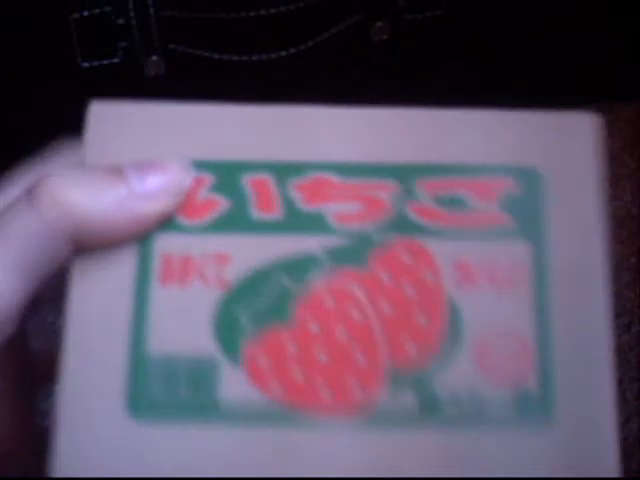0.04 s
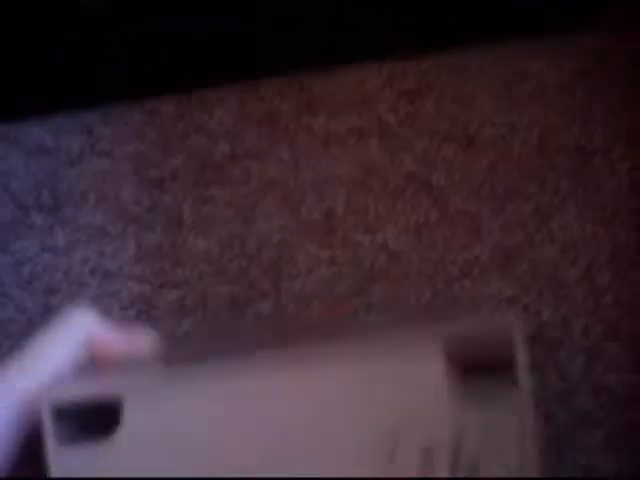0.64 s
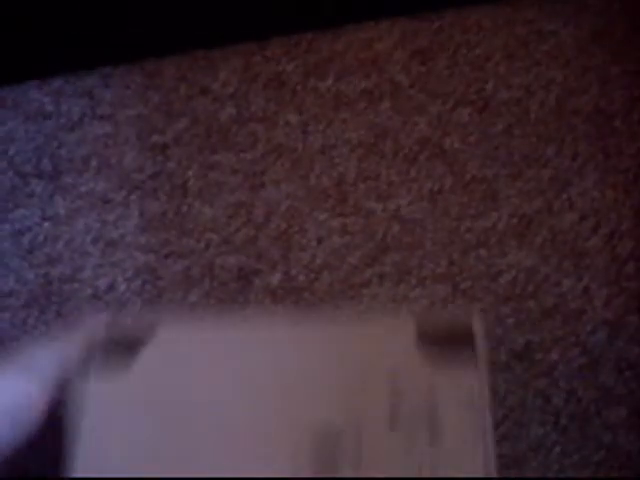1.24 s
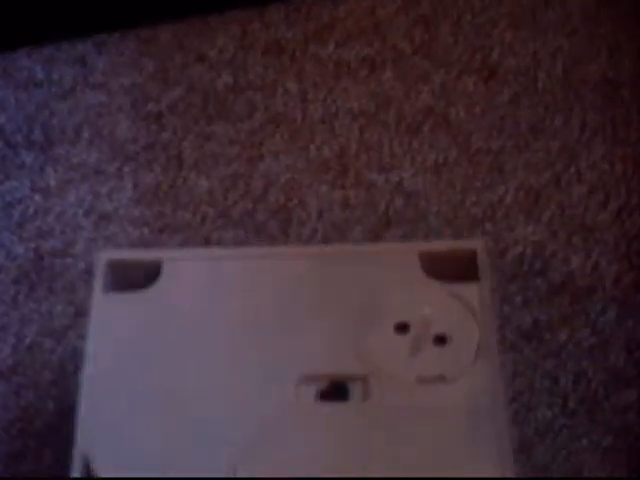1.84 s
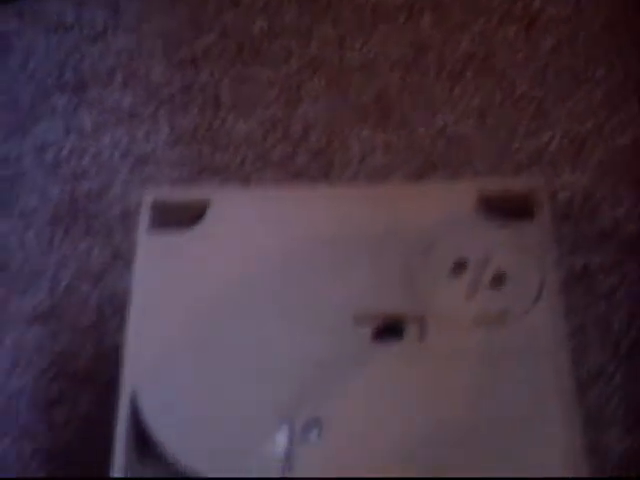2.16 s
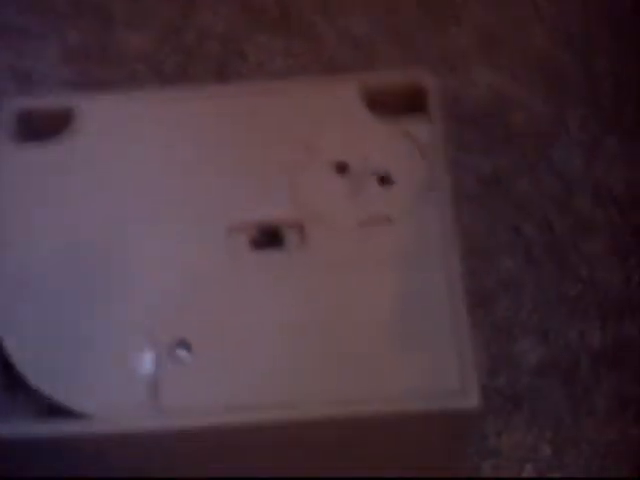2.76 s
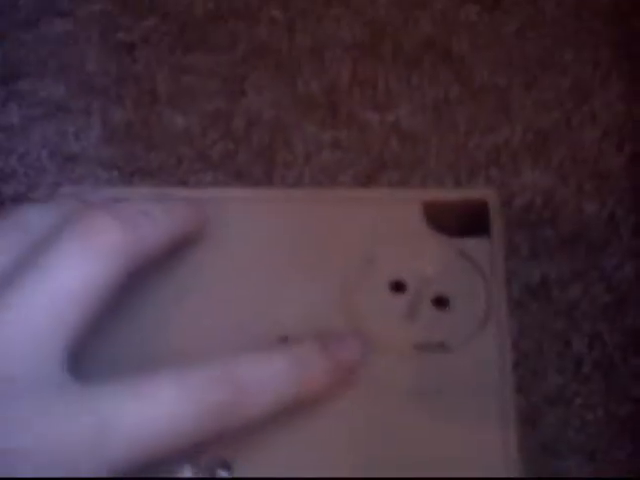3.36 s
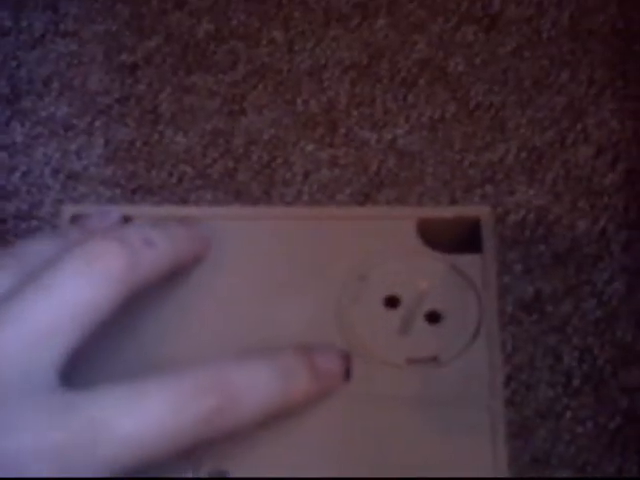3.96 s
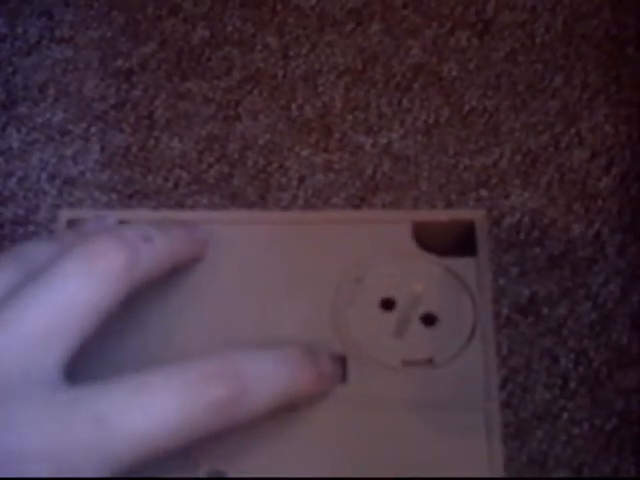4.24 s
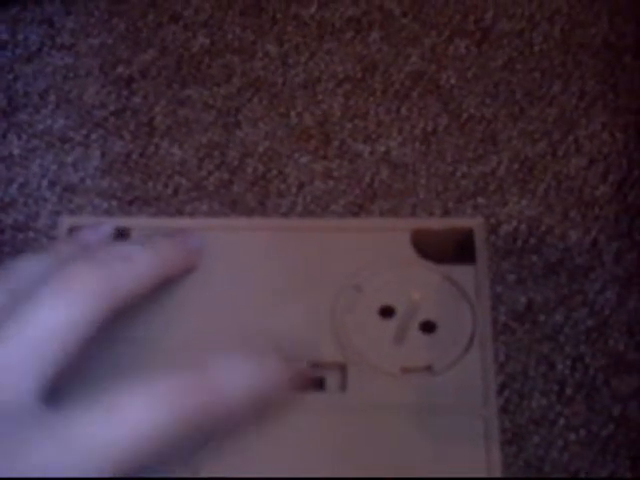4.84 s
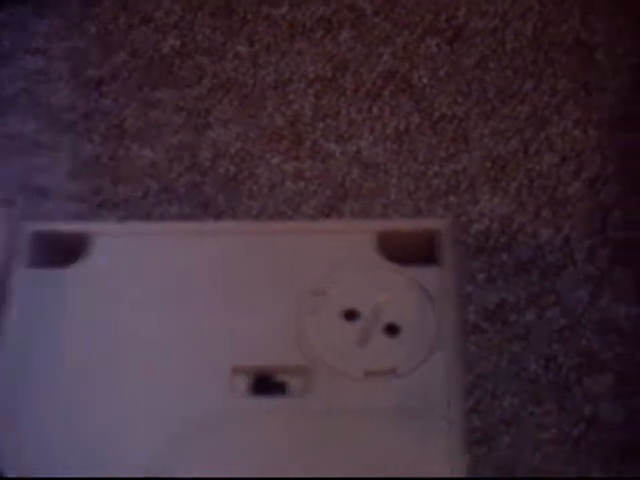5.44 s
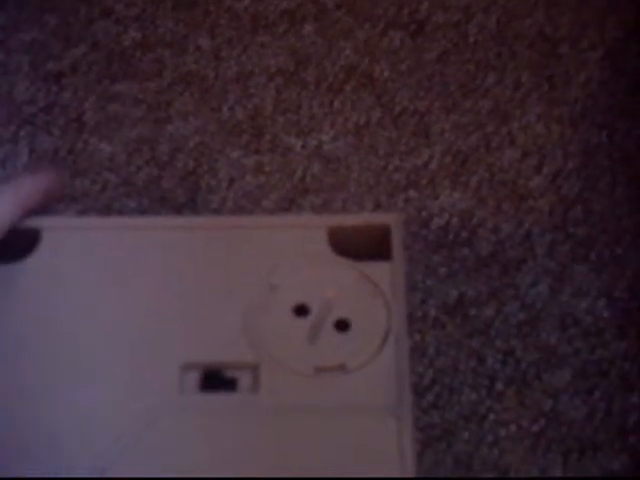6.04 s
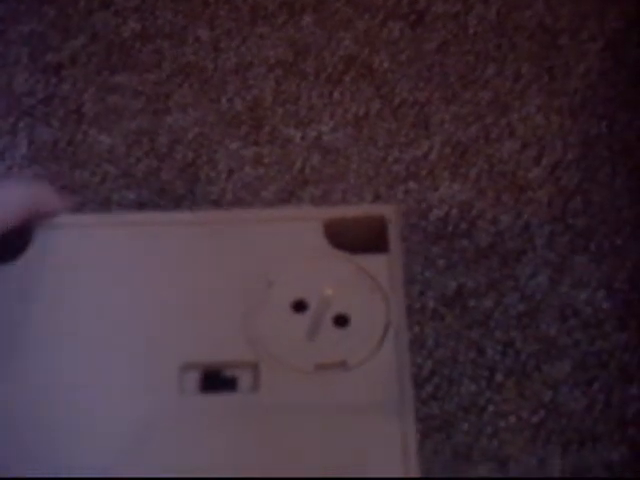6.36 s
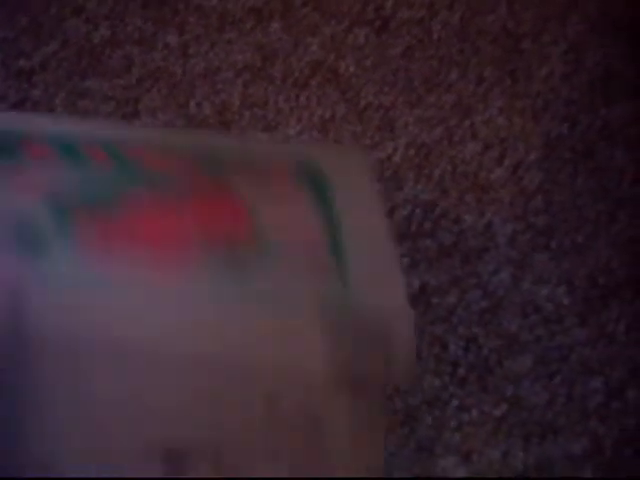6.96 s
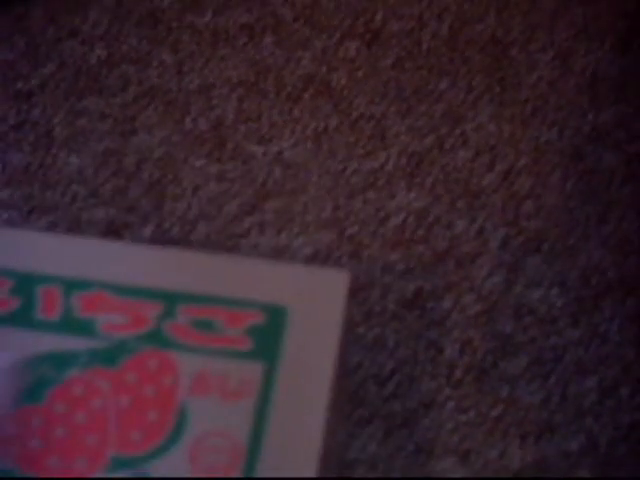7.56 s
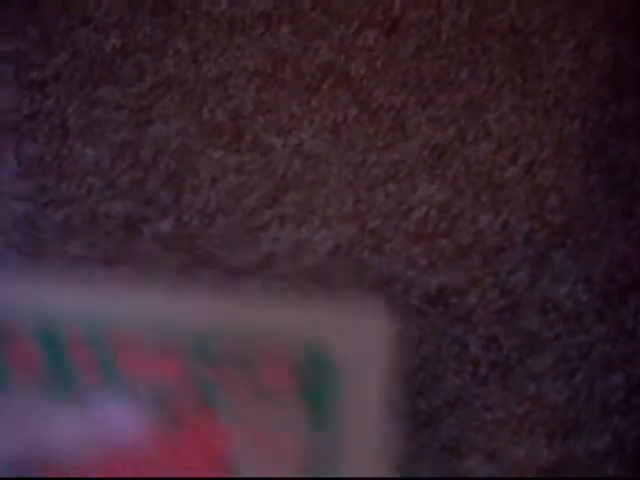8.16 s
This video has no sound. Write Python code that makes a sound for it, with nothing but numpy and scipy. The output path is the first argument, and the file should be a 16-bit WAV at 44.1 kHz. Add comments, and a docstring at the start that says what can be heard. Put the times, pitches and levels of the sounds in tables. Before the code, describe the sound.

A hollow plastic box is turned over on carpet, clattering down twice, with light taps and clicks between, over faint hiss.

```python
"""A hollow plastic toy box is turned over on a carpet, its switch is slid, and it is turned back.
Fingers press, rub and tap it, and each touch makes the shell ring. Twice it tips over, thumps the
floor and bounces while its loose parts rattle. In between, its seam snaps and the switch clicks.
The small room adds a short echo. A little camera hisses and ticks throughout, and it holds
each of its coarse samples, which adds a gritty treble."""
import sys
import numpy as np
from scipy import signal
from scipy.fft import rfft, irfft, next_fast_len
from scipy.io import wavfile
from scipy.ndimage import map_coordinates

SR = 44100
rng = np.random.default_rng(int(sys.argv[2]) if len(sys.argv) > 2 else 0)


def wav_out(sig):
    """Save sig, one row per channel (or a flat mono array), as 16-bit PCM at SR to the path in sys.argv[1]."""
    wavfile.write(sys.argv[1], SR, np.round(np.clip(np.atleast_2d(sig).T, -1, 1) * 32767).astype(np.int16))


N = 361619
CAMERA_SAMPLE_HZ = 8000


def amp(db):
    """Turn decibels into a number to multiply by."""
    return 10 ** (np.asarray(db) / 20)


def unit(x):
    """Scale a sound so its average strength (rms) is 1."""
    return x / np.sqrt(np.mean(x ** 2) + 1e-20)


def along(points, hz):
    """Read between (frequency, value) points, giving each octave about equal room."""
    point_hz, values = np.transpose(points)
    return np.interp(np.log(hz + 1), np.log(point_hz + 1), values)


def fade(t, t60):
    """Die away by 60 dB in t60 seconds, the fade time."""
    return np.exp(-np.log(1000) * t / np.maximum(t60, 1e-4))


def filtered(x, response):
    """Turn each frequency up or down by response(hz)."""
    size = next_fast_len(len(x) + SR // 4)
    return irfft(rfft(x, size) * response(np.fft.rfftfreq(size, 1 / SR)), size)[:len(x)]


def band(x, hz, kind, order=2):
    """Keep one range of frequencies."""
    return signal.sosfilt(signal.butter(order, hz, kind, fs=SR, output="sos"), x)


def resonance(x, hz, width_hz):
    """Keep a narrow band that rings around one pitch."""
    return signal.lfilter(*signal.iirpeak(hz, hz / width_hz, fs=SR), x)


def add(track, s, x):
    """Mix x into the track, starting at s seconds."""
    part = track[max(round(s * SR), 0):][:len(x)]
    part += x[:len(part)]


# The tone of the hiss, from low to high: f/Hz, relative level/dB
HISS_TONE = [(59, -18), (100, 1), (269, -6), (316, -3), (372, -5), (444, -5.5), (1180, -9.5), (3400, -7),
             (4000, -9)]


def hiss(level_db=-59.5, flutter_db=1):
    """The camera's amplifier makes a soft noise whose level wavers a little."""
    def tone(hz):
        return amp(along(HISS_TONE, hz)) * (hz > 20) * (hz < CAMERA_SAMPLE_HZ / 2)
    noise = unit(filtered(rng.standard_normal(N), tone))
    flutter = map_coordinates(rng.standard_normal(N // 100), [np.arange(N) * 90 / SR])  # 90 a second
    return noise * amp(level_db + flutter_db * flutter)


def frame_buzz(frame_hz=14.222, on_s=.0331, off_s=.0651, sag_s=.008):
    """In every frame the camera's power sags softly, then its sensor ticks on and off."""
    ticks, sags = np.zeros((2, N))
    t = np.arange(SR // 20) / SR
    spike = np.exp(-t / .00016)
    for s in np.arange(0, N / SR, 1 / frame_hz):
        on_db, off_db, sag_db = rng.normal([-47, -41.5, -48], 1.5)
        add(ticks, s + on_s, amp(on_db) * spike)
        add(ticks, s + off_s, -amp(off_db) * spike)
        add(sags, s + on_s - sag_s, -amp(sag_db) * (t < sag_s))
    # a capacitor blocks the slowest part of the sag; cutting the highs keeps it soft
    return ticks + filtered(sags, lambda hz: hz ** 2 / (hz ** 2 + 34 ** 2) / (1 + (hz / 130) ** 4))


# The tones the hollow shell rings with: f/Hz, level/dB, fade time/s
SHELL_TONES = [(367.7, -12, 0.056), (409, -9.5, 0.0408), (526, -12.5, 0.031), (707.4, -9.5, 0.071),
               (851, -7, 0.044), (964, -8.5, 0.015), (1118, -1.5, 0.023), (1266, -6.5, 0.023),
               (1465, -11.5, 0.032), (1787, -16.5, 0.019), (1796, -12.5, 0.029), (2036, -0.5, 0.016),
               (2970, -15, 0.037), (3158, -9, 0.014), (3490, -14.5, 0.016)]


def shell_ring(ring_scale=1, spread_db=3.0):
    """Each spot rings the shell with its own mix of tones. A grip (ring_scale below 1) shortens them."""
    t = np.arange(SR // 6) / SR
    hz, db, t60 = np.transpose(SHELL_TONES)[:, :, None]
    strength, detune = rng.standard_normal((2, len(SHELL_TONES), 1))
    shifted_hz = hz * (1 + .007 * detune)  # each blow also shifts the pitches a little at random
    tones = amp(db + spread_db * strength) * fade(t, ring_scale * t60) * np.sin(2 * np.pi * shifted_hz * t)
    crack = amp(6) * fade(t, 0.018) * rng.standard_normal(len(t))
    return tones.sum(0) + crack


def thud_knock_clack(x):
    """Split a sound into the hollow's low thud, the panels' knock and the edges' high clack."""
    return [band(x, hz, "bandpass", order=3) for hz in ([245, 550], [660, 1450], [1650, 3900])]


def chatter(x, chatter_s, rebound=0.69, count=3):
    """Loose parts rebound at uneven gaps, spreading a blow out in time but keeping its tone."""
    size = 2 * len(x)
    gaps_s = chatter_s * rng.uniform(.1, .55, (count, 1))
    delays = np.exp(-2j * np.pi * gaps_s * np.fft.rfftfreq(size, 1 / SR))
    rebounds = np.prod((delays + rebound) / (1 + rebound * delays), axis=0)
    return irfft(rfft(x, size) * rebounds)[:len(x)]


def strike(db, thud_db, clack_db, knock_hz, clack_hz, chatter_s, ring_scale=1, spot_db=6,
           knock_width_hz=190, clack_width_hz=190, thud_t60=.2):
    """One blow on the box. The knock peaks at db; thud_db and clack_db are counted from there."""
    ring = shell_ring(ring_scale)
    t = np.arange(len(ring)) / SR
    thud = thud_knock_clack(ring)[0] * fade(t, thud_t60)
    _, knock, clack = thud_knock_clack(chatter(ring, chatter_s))
    # a light touch rings mostly the touched spot; a hard one rings the whole shell and snaps its rim
    spot_gain = amp(spot_db - 0.17 * (db + 29))
    rim_snap = amp(-6 + 0.047 * (db + 40)) * resonance(clack, hz=2980, width_hz=500)
    knock = knock + spot_gain * resonance(knock, knock_hz, knock_width_hz)
    clack = clack + spot_gain * resonance(clack, clack_hz, clack_width_hz) + rim_snap
    thud, knock, clack = (x / np.abs(x).max() for x in (thud, knock, clack))
    # every blow also pushes the whole box against the soft floor
    push = amp(-24) * np.sin(2 * np.pi * 135 * t) * fade(t, 0.026)
    return amp(db) * (push + amp(thud_db) * thud + knock + amp(clack_db) * clack)


# Finger pads press on the shell: t/s, knock level/dB, thud above knock/dB
FINGER_PRESSES = [(0.228, -52.5, 1.5), (0.423, -56, 6.5), (6.635, -49, 1), (6.812, -46, 2.5),
                  (7.665, -46.5, -0.5)]


def presses():
    """Soft finger pads give a blurred knock with a longer thud."""
    track = np.zeros(N)
    for s, db, thud_db in FINGER_PRESSES:
        add(track, s, strike(db, thud_db, clack_db=-5, knock_hz=756, clack_hz=2030,
                             chatter_s=0.0062, thud_t60=.3))
    return track


# The shell rubs on fingers or carpet: start/s, end/s, level/dB, scratch above mid tones/dB
RUBS = [(0.491, 0.726, -72.5, 5.5), (0.976, 1.174, -57, -5), (1.523, 1.6, -47, -8), (1.58, 1.75, -60, -7.5),
        (3.148, 3.29, -63, -5), (4.059, 4.4, -73.5, -10.5), (6.455, 6.838, -61.5, -3),
        (6.781, 7.248, -61, -0.5), (7.269, 7.36, -50.5, 5), (7.429, 7.499, -49.5, -14),
        (7.502, 7.727, -65, 2.5)]


def rubbing(slips_per_s=2500):
    """Rubbing is a fast run of tiny slips, heard both directly and through the shell."""
    track = np.zeros(N)
    t = np.arange(SR) / SR  # time since the rub began
    for start, end, db, scratch_db in RUBS:
        slips = rng.standard_normal(SR) * (rng.random(SR) < slips_per_s / SR)
        through_shell = unit(signal.fftconvolve(slips, shell_ring())[:SR])
        direct = amp(-3) * unit(band(slips, 4300, "lowpass"))
        low, mid, scratch = map(unit, thud_knock_clack(through_shell + direct))
        progress = np.clip(t / (end - start), 0, 1)
        speed = np.sqrt(np.abs(np.sin(np.pi * progress)))  # speeds up, then slows to a stop
        add(track, start, amp(db) * speed * (amp(-6) * low + mid + amp(scratch_db) * scratch))
    return track


def tap(db, clack_db, knock_hz):
    """The thud grows more slowly than the knock, so soft taps sound hollow and hard ones click."""
    thud_db = -6.5 - 0.59 * (db + 40)
    return strike(db, thud_db, clack_db, knock_hz, clack_hz=2030, chatter_s=0.0018, ring_scale=.8)


# Fingers tap the shell: t/s, knock level/dB, clack above knock/dB, knock f/Hz
FINGER_TAPS = [(0.653, -56.5, 13, 877), (0.678, -46, 0.5, 830), (0.702, -58, 14, 1100),
               (0.783, -50, 2, 1060), (0.975, -32.5, -3, 930), (0.990, -41.5, 0.5, 880),
               (1.077, -38.5, -4, 1000), (1.638, -43.5, -12, 1050), (2.233, -48.5, 7, 1080),
               (2.542, -40, -19, 1050), (2.601, -41, -19, 1100), (3.158, -47, 3, 864),
               (4.052, -36, -11.5, 1130), (4.902, -44.5, -5, 1200), (5.510, -36.5, -16, 1110),
               (5.531, -39.5, -4, 743), (5.546, -39, 0, 710), (6.483, -40, -15, 970),
               (6.496, -36.5, -6.5, 1050), (6.544, -36, -12.5, 1290), (6.571, -40, -1, 670),
               (6.689, -34.5, 4, 820), (7.114, -30, -8, 920), (7.252, -41, -2, 1130),
               (7.291, -39.5, 8.5, 1350)]


def taps():
    """Fingertips and nails hit the panels, each spot with its own pitch."""
    track = np.zeros(N)
    for s, db, clack_db, knock_hz in FINGER_TAPS:
        add(track, s, tap(db, clack_db, knock_hz))
    return track


def floor_thump(t60=0.095):
    """The floor under the carpet answers a blow with a short, deep noise."""
    t = np.arange(SR // 4) / SR
    return unit(band(rng.standard_normal(len(t)), [50, 120], "bandpass")) * fade(t, t60)


def fall_hit(db, thud_db, clack_db, knock_hz=843, **spot):
    """One clattering blow on the shell as the box falls."""
    return strike(db, thud_db, clack_db, knock_hz, clack_hz=2070, chatter_s=.0026, ring_scale=.84, **spot)


# The tipping box lands: t/s, knock level/dB, thud above knock/dB, clack above knock/dB, knock f/Hz
EDGE_LANDINGS = [(1.439, -5, -15, -6, 1080), (1.452, -20.5, -10.5, -8, 850), (1.476, -16.5, -11, -0.5, 790),
                 (1.505, -12, -9, -8, 1030), (7.340, -16, -8, -3, 800), (7.38, -20, -13, -0.5, 970),
                 (7.391, -7.5, -9, -4.5, 896)]


def landings(corner_gap_s=.0052):
    """An edge thumps the floor and lands on two corners, the softer one first."""
    track = np.zeros(N)
    for s, db, thud_db, clack_db, knock_hz in EDGE_LANDINGS:
        add(track, s, amp(db - 25) * floor_thump())
        for lag_s, corner_db in (0, -5), (corner_gap_s, 0):
            add(track, s + lag_s, fall_hit(db + corner_db, thud_db, clack_db, knock_hz,
                                           spot_db=5, knock_width_hz=220, clack_width_hz=470))
    return track


def rattle(parts=2):
    """Each landing throws the loose parts up, and they drop back at random moments."""
    track = np.zeros(N)
    for s, db, *_ in EDGE_LANDINGS:
        for flight_s in rng.uniform(.009, .025, parts):
            add(track, s + flight_s, fall_hit(db - 17.5, thud_db=-13.5, clack_db=-1))
    return track


# The box rocks to rest: first bounce t/s, first knock level/dB, gap between bounces/s
BOUNCE_RUNS = [(1.551, -32, .028), (7.415, -17.5, 0.011)]


def bounces(count=4, loss_db=4.5):
    """The box bounces at even gaps, weaker each time."""
    track = np.zeros(N)
    for s, db, gap_s in BOUNCE_RUNS:
        for k in range(count):
            add(track, s + k * gap_s, fall_hit(db - k * loss_db, thud_db=-13.5, clack_db=-6.5))
    return track


# The seam snaps as the box is shifted: t/s, knock level/dB, clack above knock/dB, clack f/Hz
SEAM_CLICKS = [(2.266, -32.5, -2, 1730), (2.273, -30, -10.5, 1850), (2.570, -34.5, -1, 1870),
               (2.577, -21, -4.5, 2490)]


def seam():
    """The seam lets go in single snaps, which die fast because the shell is held."""
    track = np.zeros(N)
    for s, db, clack_db, clack_hz in SEAM_CLICKS:
        add(track, s, strike(db, thud_db=-13, clack_db=clack_db, knock_hz=1097, clack_hz=clack_hz,
                             chatter_s=.0012, ring_scale=0.47, spot_db=11.5,
                             knock_width_hz=500, clack_width_hz=150))
    return track


def stray_touches(touches_per_s=1.9):
    """Fingers bump the shell faintly at random moments in the longer rubs."""
    track = np.zeros(N)
    for start, end, *_ in RUBS:
        count = round(touches_per_s * (end - start))
        for s in rng.uniform(start, end, count):
            add(track, s, tap(db=rng.normal(-55.5, 2.5), clack_db=3, knock_hz=950))
    return track


# The switch clicks: t/s, knock level/dB, thud above knock/dB, clack above knock/dB, clack f/Hz
SWITCH_CLICKS = [(4.606, -46, -1, 3, 2450), (4.623, -45.5, 3, 9.5, 1890), (4.977, -46, -16, 9, 1880)]


def switch():
    """The small slider catches and is let go, each click ringing at a clear pitch."""
    track = np.zeros(N)
    for s, db, thud_db, clack_db, clack_hz in SWITCH_CLICKS:
        add(track, s, strike(db, thud_db, clack_db, knock_hz=1300, clack_hz=clack_hz,
                             chatter_s=0.0028, ring_scale=0.83, spot_db=19, clack_width_hz=65))
    return track


# How long the room's echo lasts, from low to high: f/Hz, fade time/s
ROOM_FADES = [(150, 0.35), (400, 0.18), (1000, 0.12), (3500, 0.16)]


def room_echo(x, build_up_s=0.0098):
    """The walls of a carpeted room send the sound back as a short, smooth tail."""
    hz, t, noise = signal.stft(rng.standard_normal(SR // 2), SR, nperseg=256)
    fading_noise = noise * fade(t, along(ROOM_FADES, hz)[:, None])
    _, tail = signal.istft(fading_noise, SR, nperseg=256)
    tail *= 1 - np.exp(-np.arange(len(tail)) / SR / build_up_s)
    return signal.fftconvolve(x, tail / np.linalg.norm(tail))[:N]


def scene():
    """The box in its room, over the camera's own noise."""
    falls = landings() + bounces() + rattle()
    handling = switch() + seam() + rubbing() + taps() + presses() + stray_touches()
    box = falls + handling
    return (box + amp(-14.5) * room_echo(box) + hiss() + frame_buzz())[None]


def record(dry, cutoff_hz=3750, top_hz=15600):
    """The camera samples slowly and holds each value, which mirrors the sound into the treble."""
    smooth = filtered(dry[0], lambda hz: 1 / np.sqrt(1 + (hz / cutoff_hz) ** 24))
    held_at = np.floor(np.arange(N) * CAMERA_SAMPLE_HZ / SR) * SR / CAMERA_SAMPLE_HZ
    steps = map_coordinates(smooth, [held_at])
    steps = steps / (1 + (steps / .8) ** 6) ** (1 / 6)  # gently squashes the hardest knocks
    return filtered(steps, lambda hz: hz < top_hz)[None]


dry = scene()
out = record(dry)
wav_out(out)
```